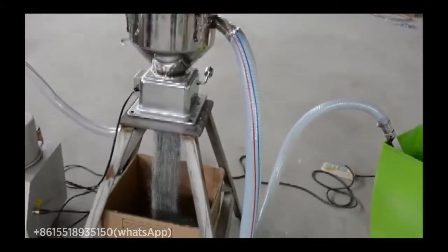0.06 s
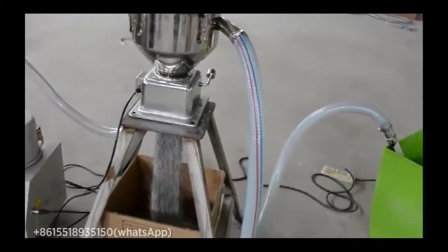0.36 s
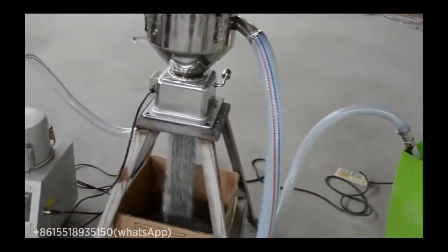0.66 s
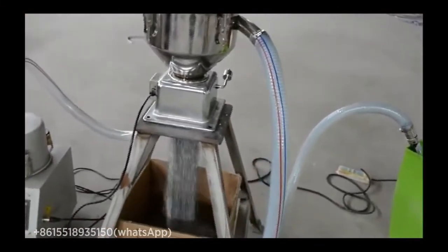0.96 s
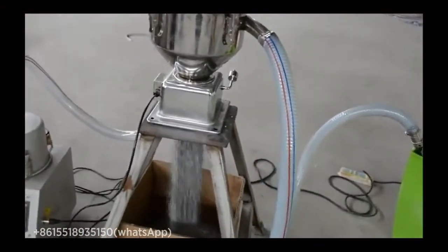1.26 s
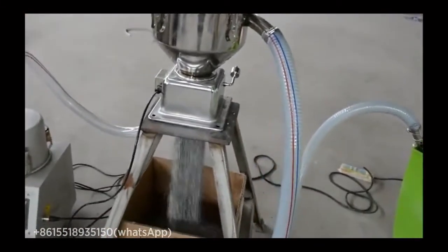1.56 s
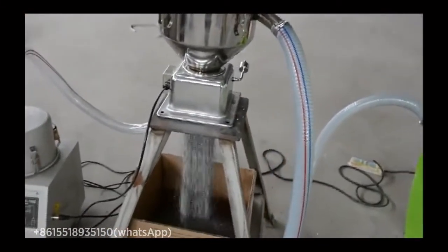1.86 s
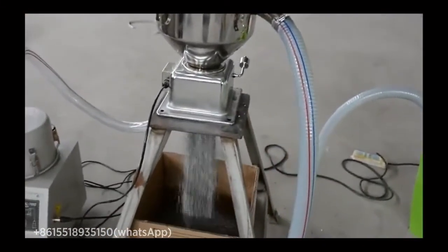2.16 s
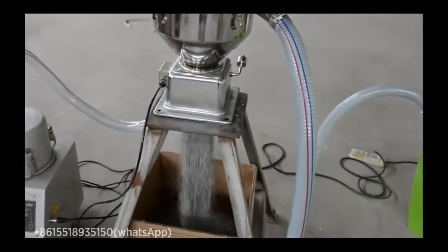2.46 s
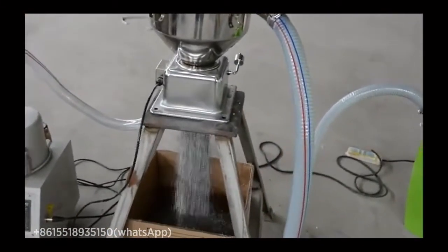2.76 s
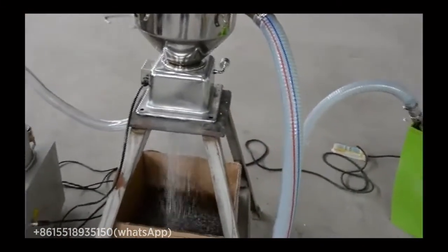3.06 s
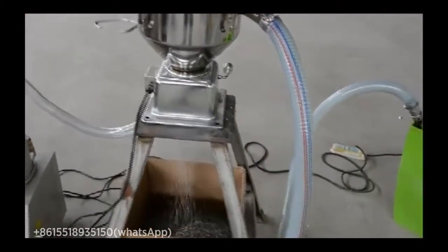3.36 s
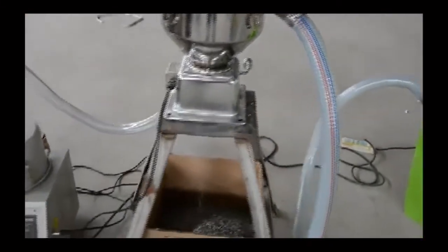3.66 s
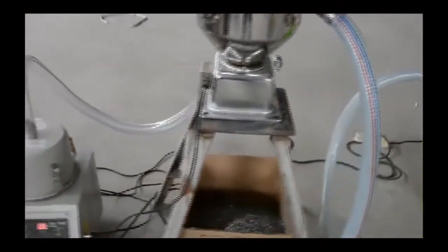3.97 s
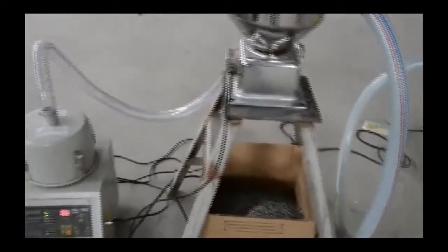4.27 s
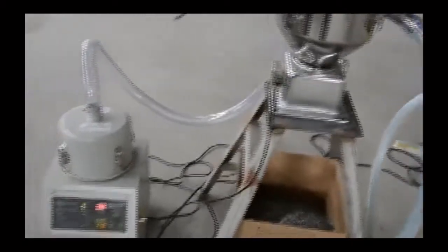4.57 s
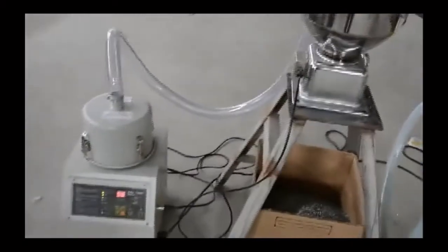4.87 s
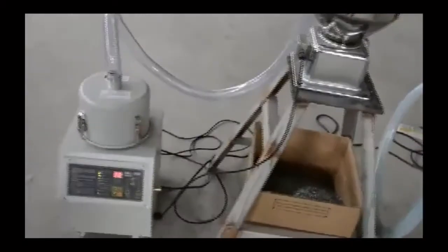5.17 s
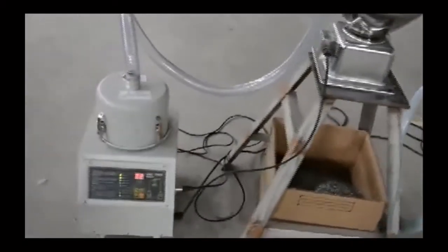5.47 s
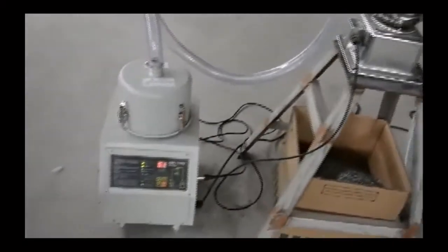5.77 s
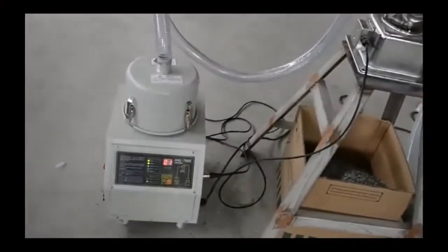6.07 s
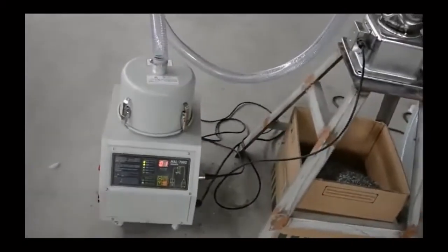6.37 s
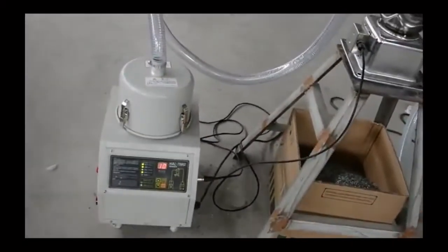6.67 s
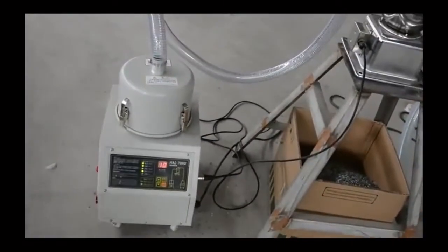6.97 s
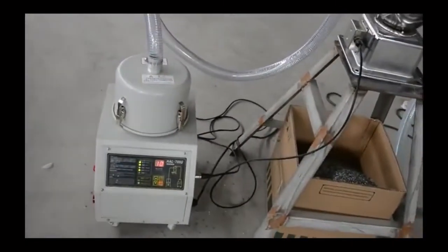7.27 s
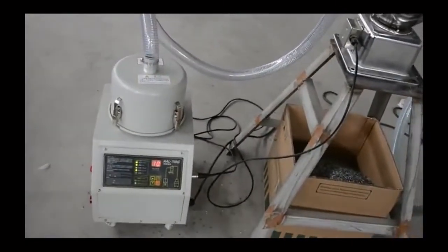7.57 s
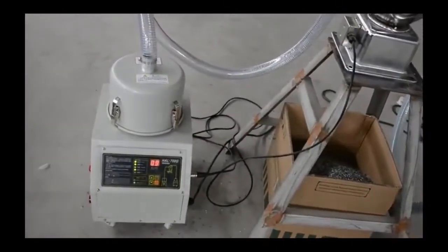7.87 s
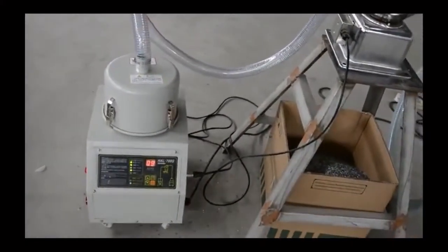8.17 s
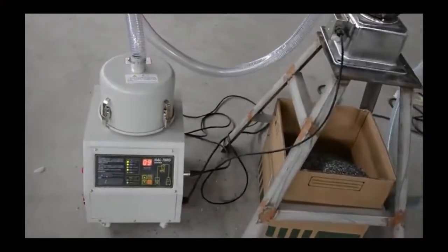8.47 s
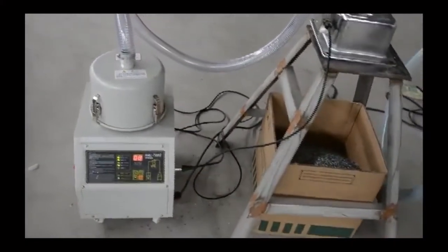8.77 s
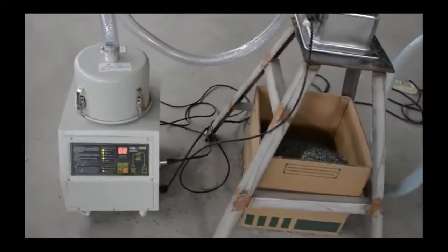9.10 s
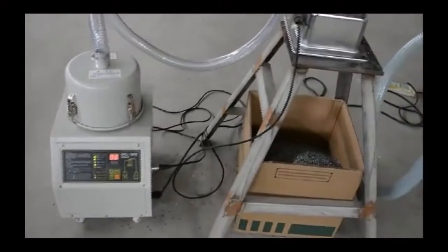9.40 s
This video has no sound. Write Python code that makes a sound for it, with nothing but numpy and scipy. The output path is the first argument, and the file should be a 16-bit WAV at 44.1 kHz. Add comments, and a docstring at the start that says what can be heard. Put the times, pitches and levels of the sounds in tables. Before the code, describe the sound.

Small hard granules pour steadily from a steel hopper into a cardboard box, surge briefly, then thin to scattered ticks. A few faint knocks and scuffs and the snap of a metal catch follow over a low workshop hum. A relay thumps and a vacuum motor whines up to speed, settling into a loud, hissing roar of air. Heard from close by in a concrete room.

```python
"""A humming concrete workshop. Hard beans pour from a steel hopper into a cardboard box: thousands of
small impacts merge into a stream that surges and trickles out. After a few scuffs, knocks and the snap
of a catch, a relay closes with a thump and a vacuum loader's motor runs up. Its shaft whines at
multiples of the rotation rate, and turbulent air roars through the drum, the hose and the exhaust."""
import sys
import numpy as np
from scipy import signal
from scipy.fft import rfft, irfft, next_fast_len
from scipy.io import wavfile
from scipy.ndimage import map_coordinates

SR = 44100
rng = np.random.default_rng(int(sys.argv[2]) if len(sys.argv) > 2 else 0)


def put_to_file(sound):
    """Save the sound as 16-bit audio at rate SR, in the file named by the first command-line argument."""
    columns = np.atleast_2d(sound).T  # one column per channel
    safe = np.clip(columns, -1, 1)
    whole_steps = np.round(safe * 32767)
    wavfile.write(sys.argv[1], SR, whole_steps.astype(np.int16))


N = 425124
T = np.arange(N) / SR
MOTOR_START_S = 6.768
# peaks and dips in the loader's roar, some at the motor's own tones:
# (frequency [Hz], width [Hz], lift [dB])
ROAR_PEAKS = [(288, 26, 2), (851.0, 38.0, 5.5), (1245.0, 100.0, 5.5), (1547.0, 202.0, -1.0),
              (2250.0, 68.0, 5.5), (2348.0, 65.0, 9.5), (2558.0, 172.0, -2.5), (3428.0, 69.0, 4.5),
              (3674.0, 125.0, 5.0), (4065.0, 385.0, -3.5), (4165.0, 53.0, 5.0), (4517.0, 140.0, 2.5),
              (5077.0, 109.0, 6.0), (5309.0, 85.0, -3.0), (5504.0, 61.0, -3.0), (5648.0, 57.0, -6.0),
              (5780.0, 197.0, 6.5), (5931.0, 75.0, 6.0), (6119.0, 74.0, -3.5), (6238.0, 64.0, 4.5),
              (6825.0, 191.0, 2.5), (7792.0, 107.0, 5.5), (8057.0, 48.0, 4.0), (8171.0, 43.0, 3.5),
              (8560.0, 88.0, 3.0), (8982.0, 154.0, 4.5), (9223.0, 105.0, 3.5), (9591.0, 101.0, -2.0),
              (10240.0, 199.0, 3.0), (10597.0, 174.0, 4.0), (11774.0, 54.0, 4.5), (12399.0, 188.0, -2.5),
              (13532.0, 308.0, 3.5)]


def pour(impacts_per_s=2200, surge_s=3.06, empty_s=3.415, drain_s=0.105, crossover_hz=5500):
    """Shot noise: random impacts sum to a stream that surges, then thins into clumps as it drains."""
    # spectrum of the impacts: (frequency [Hz], level [dB])
    beans = [(150, -25), (240, -8), (400, -8.5), (530, -10.5), (749, -2.5), (1250, -3.5), (1400, -5),
             (1700, 0), (2350, 3), (2660, -3), (4050, -3), (4600, -4), (9900, -4), (14000, -22.5)]
    # resonances of box and chute: (frequency [Hz], width [Hz], lift [dB])
    chute = [(714, 130, 2), (1180, 280, 3), (2340, 170, -4.5), (3970, 400, 1.5)]
    # modes of the hopper: (frequency [Hz], width [Hz], level [dB])
    hopper = [(1600, 150, 0), (2200, 190, 11), (2400, 150, 11), (3000, 200, -1), (3980, 250, -1),
              (4680, 200, -3), (5280, 200, -2)]
    # the stream before surge and drain apply: (time [s], level [dB])
    contour = [(0.0, -31.5), (1.63, -34), (1.83, -31.5), (3.05, -31.5), (3.45, -33)]
    surge = ramp(surge_s, surge_s + .09)  # the last of the load slides out in a rush
    remaining = (1 + np.maximum(T - empty_s, 0) / drain_s) ** -1.2
    flow = amp(4 * surge) * remaining
    rate = impacts_per_s * np.minimum(flow, 1) ** .36
    size, hardness = np.clip(rng.standard_normal((2, N)), -3, 2.1)
    hits = (rng.random(N) < rate / SR) * amp(size) / np.sqrt(rate + 1)
    hits *= amp(1.2 * wobble(150))  # beans land in clusters
    dull = clicks(hits, t60=.012)
    bright = clicks(hits * amp(-.5 * hardness), t60=.019)
    rolloff = lambda ratio: -10 * np.log10(1 + ratio ** 4)
    patter = coloured(dull, lambda hz: along(beans, hz) + lifts(chute, hz) + rolloff(hz / crossover_hz))
    hiss = coloured(bright, lambda hz: along(beans, hz) + rolloff(crossover_hz / (hz + 1)))
    strikes = clicks(hits * amp(4.5 * hardness), t60=.009)  # the hardest beans rattle the steel
    ring = coloured(strikes, lambda hz: passbands(hopper, hz))
    # bared steel rings harder as the load sinks
    ring_db = -19 + (2.5 * np.minimum(T, surge_s) + 4.5 * surge) * remaining ** 2
    stream = unit(patter) * amp(-2.5) + unit(hiss) * amp(-5.5 + 2.1 * surge) + unit(ring) * amp(ring_db)
    clumps_db = 1.6 * (1 - remaining) * wobble(35)
    gain = amp(np.interp(T, *np.transpose(contour)) + clumps_db) * flow * (1 - ramp(4.0, 5.1))
    return stream * gain + pings(gain)


def pings(stream_gain, per_s=90, centre_hz=2200, spread_octaves=.55, t60=.035):
    """Damped free vibration: a bean that lands squarely rings at a pitch of its own."""
    out, t = np.zeros((2, N)), np.arange(SR // 20) / SR
    count = round(per_s * N / SR)
    starts = rng.integers(0, N, count)
    for start, (pitch, size) in zip(starts, np.clip(rng.standard_normal((count, 2)), -2, 2)):
        hz = centre_hz * 2 ** (spread_octaves * pitch)
        ring = np.sin(2 * np.pi * hz * t) * amp(-7 + 3.5 * size - 60 * t / t60)
        add(out[:1], start / SR, stream_gain[start] * ring)
    return out


def stray_beans(tick_t60=0.023, ring_t60=0.06):
    """Impact excitation: single beans tick broadly on steel and card and leave a narrow-band ring."""
    # single impacts: (time [s], tick level [dB], ring level [dB], ring frequency [Hz])
    impacts = [(3.464, -17.5, -29, 2370), (3.585, -33, -50, 1590), (3.623, -19, -34, 2210),
               (3.669, -21, -33, 2320), (3.696, -30, -38, 1610), (3.717, -20.5, -34, 2090),
               (3.756, -26, -38, 3020), (3.867, -31.5, -36, 3130), (3.956, -29, -42, 1500),
               (4.003, -24.5, -37, 2060), (4.022, -25.5, -35.5, 2320), (4.073, -29, -41, 1570),
               (4.17, -27.5, -41, 2010), (4.181, -27, -46, 1750), (4.219, -33, -36.5, 1970),
               (4.247, -32, -41, 1960), (4.372, -28, -44, 1820), (4.477, -29, -41, 1630),
               (4.769, -32, -42, 3220), (4.825, -38, -44, 1340), (5.757, -39, -49, 1660),
               (5.853, -36, -51, 1720)]
    # (frequency [Hz], level [dB])
    tick_spectrum = [(500, -14), (2000, -1), (6000, -3.5), (9500, 1), (11500, -6), (13500, -15)]
    out, t = np.zeros((2, N)), np.arange(SR // 8) / SR
    for s, tick_db, ring_db, pitch in impacts:
        tick = noise(lambda hz: along(tick_spectrum, hz), len(t))
        ring = noise(lambda hz: -20 * np.log10(1 + (4 * (hz / pitch - 1)) ** 2), len(t))
        add(out, s, tick * amp(tick_db - 8 - 60 * t / tick_t60))
        add(out, s, ring * amp(ring_db - 1 - 60 * t / ring_t60))
    return out


def airflow(vacuum_s=0.99, brush_db=-31.5, howl_db=-29):
    """Turbulence noise and the friction hiss of the motor's brushes, each a power law of shaft speed."""
    # spectra of the brushes and of air in drum, hose and exhaust: (frequency [Hz], level [dB])
    brushes = [(800, -12), (2300, 5), (4500, -12), (9000, 7), (14000, -31)]
    boom = [(24, -47), (50, -36), (90, -28.5), (130, -18), (200, -5), (282, 5), (370, -0.5), (440, -10),
            (520, -15), (700, -51), (1200, -78)]
    rush = [(350, -30), (520, 5), (670, 1), (1000, 3), (1500, 0), (2200, -0.5), (2700, 0.5), (3600, -4),
            (4500, -8), (7000, -34.5)]
    jet = [(2240, -41), (3800, -1.5), (3950, 0), (4980, 3.5), (5470, 1.5), (5780, 1.5), (6240, 3),
           (7050, 4), (10300, 3.5), (13700, -6), (14200, -21)]
    # drum, hose, exhaust: (final level [dB], speed exponent, change as the vacuum builds [dB])
    flow_laws = [(-26.5, 2.74, -5), (-22, 2.6, 0.1), (-14.5, 4.95, 6.5)]
    # the exhaust's hollow note: (frequency [Hz], width [Hz], level [dB])
    howl_modes = [(3112, 140, 11), (3180, 60, -13)]
    speed = shaft_speed()
    vacuum_to_build = np.exp(-np.maximum(T - MOTOR_START_S, 0) / vacuum_s)
    out = noise(lambda hz: along(brushes, hz) + lifts(ROAR_PEAKS, hz)) * amp(brush_db) * speed ** 2.5
    for spectrum, (db, power, build_db) in zip((boom, rush, jet), flow_laws):
        flow = noise(lambda hz: along(spectrum, hz) + lifts(ROAR_PEAKS, hz))
        out += flow * speed ** power * amp(db - build_db * vacuum_to_build + .5 * wobble(30))
    howl = noise(lambda hz: passbands(howl_modes, hz))
    return out + howl * amp(howl_db) * speed ** 6


def pipe_resonance(air, swell_db=1.2):
    """Standing waves in the hose lift narrow bands of the air noise near full speed; each wavers."""
    # pipe modes: (frequency [Hz], width [Hz], lift [dB])
    modes = [(1698, 34, 8.5), (1807, 20, 14), (1940, 40, 12), (7219, 87, 6)]
    drive = shaft_speed() ** 6
    notes = (coloured(air, lambda hz: lifts([mode], hz)) - air for mode in modes)
    return air + sum(note * drive * amp(swell_db * wobble(4)) for note in notes)


def hose_whistle(fade_s=0.017):
    """Vortex shedding: air over the hose's ribs sings one fluttering note, then hops to a higher one."""
    # notes of the hose: (start [s], end [s], frequency [Hz], level [dB])
    notes = [(7.59, 7.743, 5075, -29), (7.738, 7.86, 5578, -28)]
    out = np.zeros(N)
    for start, end, hz, db in notes:
        held = ramp(start, start + fade_s) * (1 - ramp(end, end + fade_s))
        envelope = held * amp(db + 3 * wobble(90))
        out += envelope * np.sin(2 * np.pi * hz * T + .6 * wobble(70) + .55 * wobble(350))
    return out


def motor(top_turns_per_s=285.4, mount_hz=217, mount_width_hz=24, shudder_db=-29):
    """Rotational harmonics: tones locked to the shaft glide up; the rough ones swell and fade again."""
    # unbalance and fan blades: (shaft order, level [dB], speed exponent)
    whine = [(1, -39, 3.7), (3, -45.5, 12), (12, -47, 3.3)]
    # passing fan and commutator tones:
    # (shaft order, level [dB], loudest at [share of full speed], span [same], roughness [rad])
    run_up = [(6, -39, .69, .13, .4), (12, -47, .66, .12, .7), (12, -38.5, .86, .05, .6),
              (22, -39.5, .68, .07, .8), (44, -57, .5, .12, 1.5)]
    speed = shaft_speed()
    turns_per_s = top_turns_per_s * speed
    angle = 2 * np.pi * np.cumsum(turns_per_s) / SR + .088 * wobble(30) + .014 * wobble(300)
    tones = sum(amp(db + 3.5 * wobble(32)) * speed ** power * np.sin(order * angle)
                for order, db, power in whine)
    for order, db, loudest, span, roughness in run_up:
        swell = np.exp(-.5 * ((speed - loudest) / span) ** 2) * amp(db + 2.3 * wobble(60))
        tones += swell * np.sin(order * angle + roughness * wobble(400))
    tones = coloured(tones, lambda hz: lifts(ROAR_PEAKS, hz))[0]
    # the unbalanced rotor shakes the casing as it passes through the mount's resonance
    mount_gain = lifts([(mount_hz, mount_width_hz, amp(shudder_db))], turns_per_s)
    shudder = np.sin(angle) * mount_gain * amp(6 * wobble(45))
    return np.sqrt(2) * casing_radiation((tones + shudder) * ramp(6.8, 6.9))


def shaft_speed(spin_up_s=.288):
    """First-order lag: the motor's share of full speed approaches 1 exponentially."""
    return 1 - np.exp(-np.maximum(T - MOTOR_START_S, 0) / spin_up_s)


def switch_on(crack_t60=0.06, rattle_t60=0.2, attack_s=0.0047):
    """Impulse response: the relay snaps and the motor's kick rings and rattles the casing."""
    # blows on the casing: (time [s], ring level [dB], crack level [dB])
    blows = [(6.766, -42, -35), (6.780, -11, -14), (6.790, -12.5, -16), (6.808, -17.5, -26),
             (6.826, -22, -31), (6.9, -23.5, -45), (7.031, -25.5, -27)]
    # modes of the casing: (frequency [Hz], level [dB], t60 [s])
    modes = [(242.7, -3.5, 0.3), (284.4, 6, 0.15), (359.4, -8.5, 0.36), (573, -23.5, .3), (905, -20, 0.26),
             (1161, -8.5, 0.15), (1308, -13, 0.17), (1360, -22, .11), (2080, -19, .12), (2910, -9, 0.051)]
    # spectra of a blow: (frequency [Hz], level [dB])
    crack_spectrum = [(88, -59), (150, -35), (265, -10), (487, -35), (928, -13), (1190, -1), (1490, -43),
                      (1800, -7.5), (4480, -16.5), (10100, -19), (14000, -44)]
    rattle_spectrum = [(50, -10), (150, -4), (300, -11), (520, 1), (1150, 11), (2700, -1), (8000, -36)]
    out, t = np.zeros((2, N)), np.arange(SR // 2) / SR
    for s, ring_db, crack_db in blows:
        crack = noise(lambda hz: along(crack_spectrum, hz), len(t)) * amp(-60 * t / crack_t60)
        rattle = noise(lambda hz: along(rattle_spectrum, hz), len(t)) * amp(-3 - 60 * t / rattle_t60)
        blow = amp(crack_db) * (crack + rattle)
        ring = sum(damped_mode(mode, t) for mode in modes)
        blow[0] += amp(ring_db) * casing_radiation(ring * (1 - np.exp(-t / attack_s)))
        add(out, s, blow)
    return out


def casing_radiation(x, cutoff_hz=185):
    """Radiation efficiency: a casing small against the wavelength gives off almost no deep bass."""
    return signal.sosfilt(signal.butter(6, cutoff_hz, 'high', fs=SR, output='sos'), x)


def steel_part(hits, modes, contact_db, contact_t60=.05):
    """Modal vibration: each contact on a small steel part ticks and rings its modes anew."""
    # (frequency [Hz], level [dB])
    tick_spectrum = [(300, -6), (4800, 0), (7000, -14), (13000, -24)]
    out, t = np.zeros((2, N)), np.arange(SR // 4) / SR
    knots = t[::256]
    phase_drift = lambda: .7 * np.interp(t, knots, rng.standard_normal(len(knots)))
    for s, db in hits:
        ring = sum(damped_mode(mode, t, phase_drift) for mode in modes)
        blow = noise(lambda hz: along(tick_spectrum, hz), len(t))
        blow *= amp(contact_db - 60 * t / contact_t60)
        blow[0] += ring * (1 - np.exp(-t / .0004))
        add(out, s, amp(db) * blow)
    return out


def hopper_flap():
    """Plate vibration: the steel flap rings as suction pulls it shut."""
    # contacts: (time [s], level [dB])
    hits = [(7.031, -29), (7.037, -21)]
    # modes of the flap: (frequency [Hz], level [dB], t60 [s])
    modes = [(2750, -5, .06), (3880, -7, .06), (4300, -1.5, .06), (4450, -11, .05)]
    return steel_part(hits, modes, contact_db=-8)


def steel_catch():
    """Contact chatter: a catch snaps shut in a quick run of ringing impacts."""
    # contacts: (time [s], level [dB])
    hits = [(5.099, -49), (5.117, -37.5), (5.122, -36.5), (5.131, -39), (5.141, -43)]
    # modes of the catch: (frequency [Hz], level [dB], t60 [s])
    modes = [(1200, -7, .07), (1510, -4, .08), (2200, -7, .1), (2880, 0, .13), (3220, -5, .1),
             (3960, -9, .07), (4230, -12, .08), (4830, -9, .08)]
    return steel_part(hits, modes, contact_db=-1)


def knocks(rattle_db=-6):
    """Heavily damped impacts: one sharp push, then a short hollow rattle of the same colour."""
    # knocks on casing and box: (time [s], level [dB], frequency [Hz], t60 [s])
    impacts = [(5.117, -33, 480, .04), (5.271, -33, 820, .06), (5.401, -35, 1600, .03)]
    out, t = np.zeros((2, N)), np.arange(SR // 8) / SR
    for s, db, pitch, t60 in impacts:
        colour = lambda hz: -9 * np.log2((hz + 1) / pitch) ** 2
        push = coloured(1. * (t == 0), colour)[0]
        knock = noise(colour, len(t)) * amp(rattle_db - 60 * t / t60)
        knock[0] += push / np.abs(push).max()
        add(out, s, amp(db) * knock)
    return out


def scuffs(lead_s=.1):
    """Source and filter: noise bursts, quick for a bump and slow for a scuff, excite the steel stand."""
    # bumps and scuffs: (time [s], level [dB], frequency [Hz], rise [s], t60 [s])
    bursts = [(1.189, -40, 310, 0.015, 0.15), (1.29, -42, 320, 0.0093, 0.08), (4.67, -40, 520, 0.01, 0.055),
              (4.99, -45, 1900, 0.024, 0.18), (5.08, -56.5, 7500, 0.12, 0.45),
              (5.689, -41.5, 2610, 0.033, 0.28), (5.699, -38, 2070, .002, .08), (5.79, -47, 2920, .03, .11),
              (6.448, -44.5, 2800, .004, .073)]
    # resonances of the stand: (frequency [Hz], width [Hz], lift [dB])
    stand = [(298, 28, 21), (1550, 160, 7), (2090, 99, 12), (2920, 140, 2), (3160, 140, 8), (4400, 600, 0),
             (9400, 500, 20)]
    out, t = np.zeros((2, N)), np.arange(SR // 2) / SR - lead_s
    for s, db, pitch, rise, t60 in bursts:
        burst = noise(lambda hz: lifts(stand, hz) - 8 * np.log2((hz + 1) / pitch) ** 2, len(t))
        envelope = amp(db - 60 * np.maximum(t, 0) / t60) * np.exp(np.minimum(t, 0) / rise)
        grain = amp(.5 * wobble(290)[:len(t)])
        add(out, s - lead_s, burst * envelope * grain)
    return out


def workshop(air_db=-48.5, whistle_db=-67.5, whistle_hz=5870):
    """Ambient noise: a dull wash grows slightly, a low hum recedes and a thin whistle fades in."""
    # a low wavering hum that recedes as the pour ends: (frequency [Hz], level [dB])
    hum_tones = [(188.4, -57.5), (355.3, -59)]
    # the workshop's noise: (frequency [Hz], level [dB])
    spectrum = [(25, -32), (68, -10), (150, -4.5), (300, -1.5), (620, -2), (1100, -4.5), (1900, -9),
                (3100, -13.5), (5400, -21), (9500, -24.5), (11500, -26), (14000, -44)]
    shift = ramp(2.8, 4.3)
    air = noise(lambda hz: along(spectrum, hz)) * amp(air_db + 2.5 * shift + .6 * wobble(9))
    hum = sum(amp(db + 2 * wobble(8)) * np.sqrt(2) * np.sin(2 * np.pi * hz * T + 1.1 * wobble(18))
              for hz, db in hum_tones)
    air[0] += hum * amp(-6 * shift)
    whistle = noise(lambda hz: -20 * np.log10(1 + ((hz - whistle_hz) / 70) ** 2))
    return air + whistle * amp(whistle_db) * ramp(5.3, 5.9)


def reverberation(x):
    """Diffuse reflections from the concrete walls decay exponentially, band by band."""
    # reverberation time: (frequency [Hz], t60 [s])
    walls = [(200, 0.71), (2000, 0.68), (10000, 1)]
    hz, t, bands = signal.stft(rng.standard_normal((2, SR // 2)), SR, nperseg=256)
    tail = signal.istft(bands * amp(-60 * t / along(walls, hz)[:, None]), SR, nperseg=256)[1]
    response = np.pad(tail, ((0, 0), (SR // 200, 0))) / np.linalg.norm(tail[0])
    return signal.oaconvolve(x, response, axes=1)[:, :N]


def clicks(hits, t60):
    """Incoherent summation: each impact leaves a decaying burst of noise, and their energies add."""
    energy = signal.lfilter([1], [1, -amp(-120 / (SR * t60))], hits ** 2)
    return np.sqrt(energy) * rng.standard_normal((2, N))


def damped_mode(mode, t, phase_drift=lambda: 0):
    """A damped oscillator with a random starting phase."""
    hz, db, t60 = mode
    return amp(db - 60 * t / t60) * np.sin(2 * np.pi * (hz * t + rng.random()) + phase_drift())


def lifts(peaks, hz):
    """Sum of Lorentzian resonance curves, in the unit of their heights."""
    return sum(height / (1 + (2 * (hz - centre) / width) ** 2) for centre, width, height in peaks)


def passbands(modes, hz):
    """Gain in dB of resonators in parallel."""
    return 20 * np.log10(lifts([(centre, width, amp(db)) for centre, width, db in modes], hz))


def coloured(x, gain_db):
    """Minimum-phase filtering; gain_db is a function of frequency."""
    size = 16384
    cepstrum = irfft(np.log(amp(gain_db(np.fft.rfftfreq(size, 1 / SR))) + 1e-6))
    cepstrum[1:size // 2] *= 2
    cepstrum[size // 2 + 1:] = 0
    response = irfft(np.exp(rfft(cepstrum)))[:size // 2]
    return signal.oaconvolve(np.atleast_2d(x), response[None], axes=1)[:, :x.shape[-1]]


def noise(gain_db, length=N):
    """Two uncorrelated coloured noises of rms 1."""
    return unit(coloured(rng.standard_normal((2, length)), gain_db))


def spread(pair, side_levels):
    """Mid-side stereo: the second signal, filtered, is added on the left and subtracted on the right."""
    side = coloured(pair[1], lambda hz: along(side_levels, hz))[0]
    return np.array([pair[0] + side, pair[0] - side])


def amp(db):
    """Decibels to gain."""
    return 10 ** (np.asarray(db) / 20)


def unit(x):
    """Scaled to rms 1."""
    return x / np.sqrt(np.mean(x ** 2) + 1e-20)


def along(points, hz):
    """Interpolates (frequency [Hz], value) points on a log axis."""
    f, v = np.transpose(points)
    return np.interp(np.log(hz + 1), np.log(f + 1), v)


def wobble(rate):
    """A smooth random curve, rate knots a second."""
    return map_coordinates(rng.standard_normal(int(N * rate / SR) + 4), [T * rate])


def ramp(start, end):
    """Rises from 0 to 1 between two times."""
    return np.clip((T - start) / (end - start), 0, 1)


def add(track, s, sound):
    """Mixes a short sound in at s seconds."""
    part = track[:, round(s * SR):][:, :sound.shape[-1]]
    part += sound[..., :part.shape[-1]]


def scene(wet_db=-9):
    """Superposition: all sources add, and the beans and blows also reverberate."""
    # nearly mono in the middle, wider in the treble: (frequency [Hz], side level [dB])
    beans_side = [(100, -7), (900, -54), (3700, -56), (7900, -19.5), (13000, -4)]
    air_side = [(60, -20), (200, -101), (540, -55), (1620, -86), (4850, -53), (7900, -9), (13000, -9.5)]
    # sound from all around: (frequency [Hz], side level [dB])
    diffuse_side = [(100, -28), (250, -23), (700, -14), (2000, -24), (6000, -6), (13000, -1)]
    flap, catch = hopper_flap(), steel_catch()
    direct = (pour() + stray_beans(), switch_on() + flap, scuffs() + knocks() + catch)
    beans, kick, clatter = (x + amp(wet_db) * reverberation(x) for x in direct)
    air = spread(pipe_resonance(airflow()), air_side)
    surroundings = spread(kick + clatter + workshop(), diffuse_side)
    return spread(beans, beans_side) + air + surroundings + motor() + hose_whistle()


def record(dry, top_hz=14350):
    """Band limiting: an ideal low-pass filter removes the highest treble."""
    size = next_fast_len(N + SR // 2)
    passband = np.fft.rfftfreq(size, 1 / SR) < top_hz
    return irfft(rfft(dry, size) * passband, size)[:, :N]


dry = scene()
out = record(dry)
put_to_file(out)
```